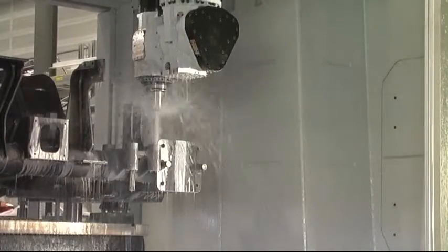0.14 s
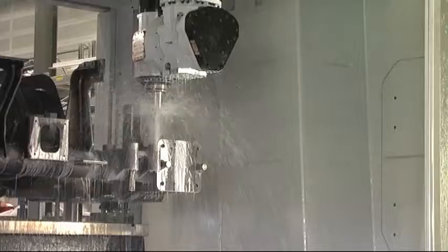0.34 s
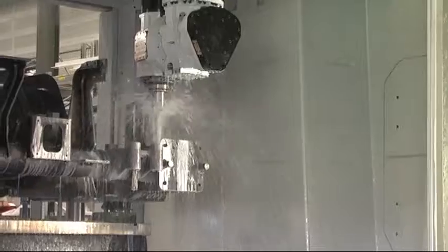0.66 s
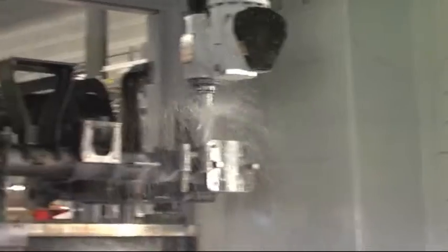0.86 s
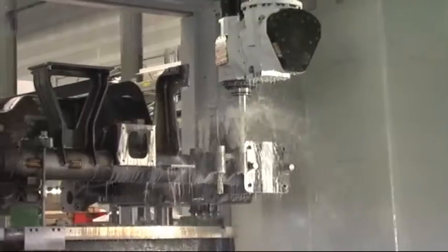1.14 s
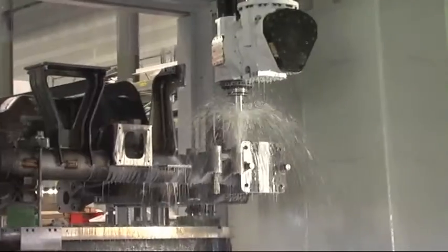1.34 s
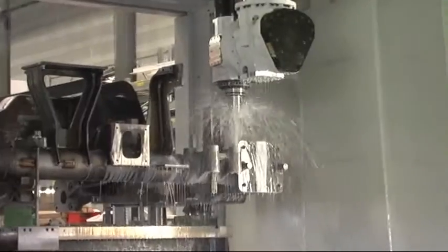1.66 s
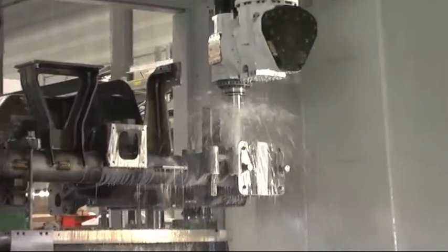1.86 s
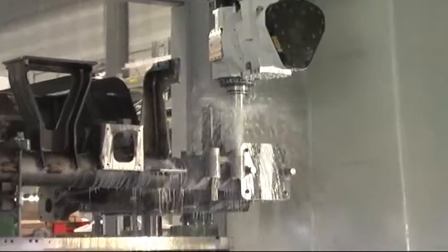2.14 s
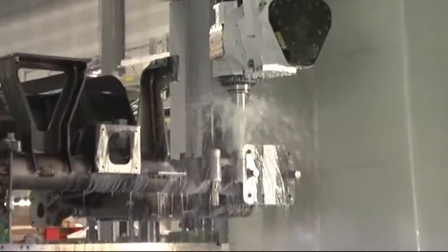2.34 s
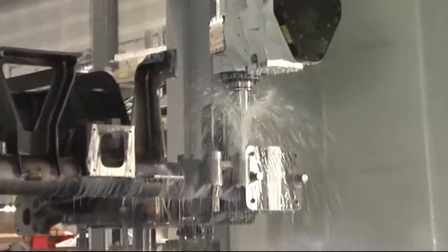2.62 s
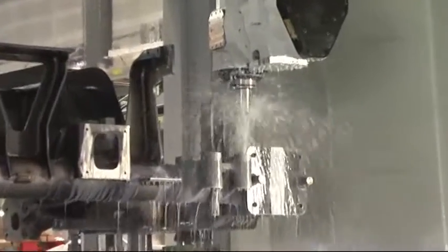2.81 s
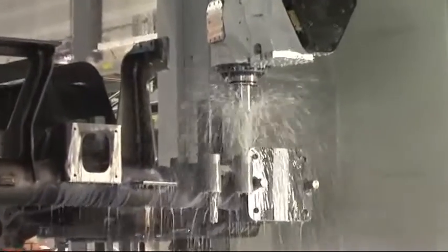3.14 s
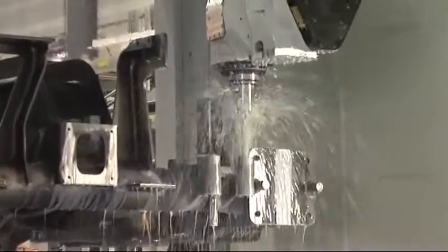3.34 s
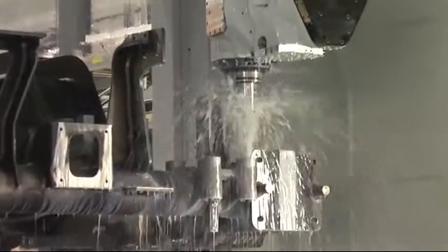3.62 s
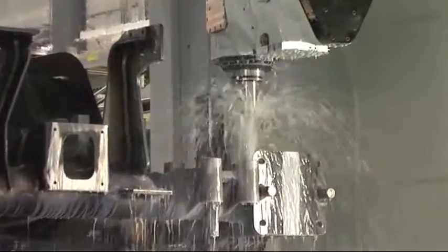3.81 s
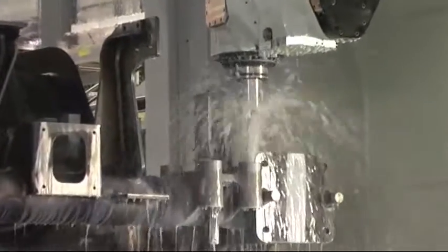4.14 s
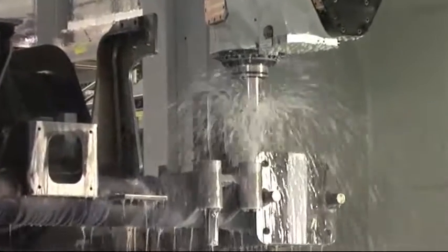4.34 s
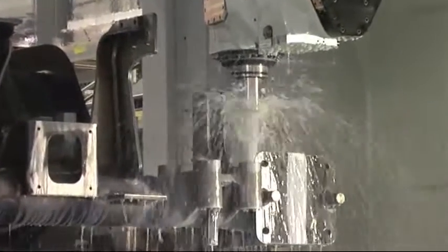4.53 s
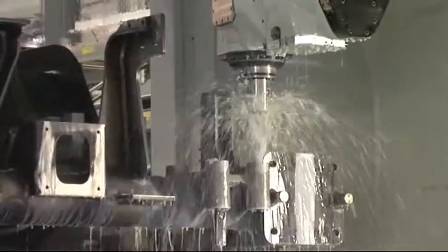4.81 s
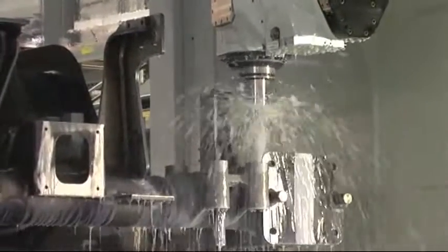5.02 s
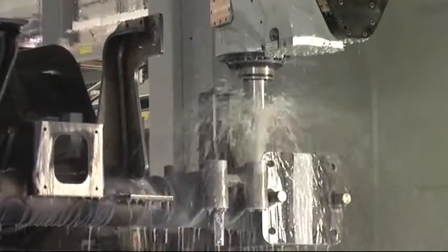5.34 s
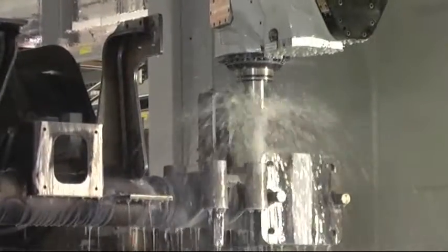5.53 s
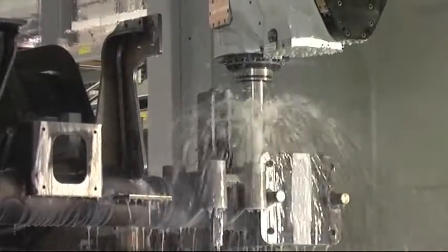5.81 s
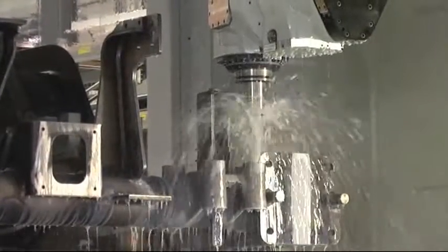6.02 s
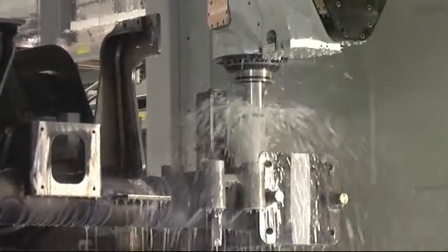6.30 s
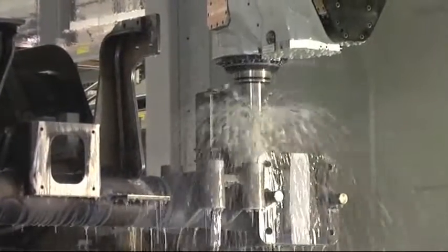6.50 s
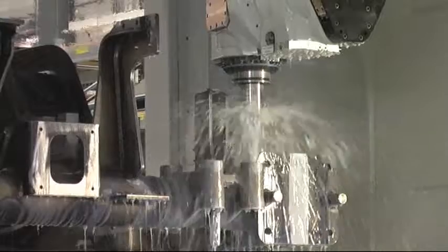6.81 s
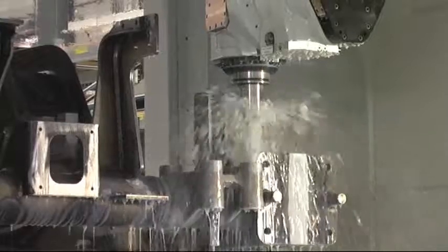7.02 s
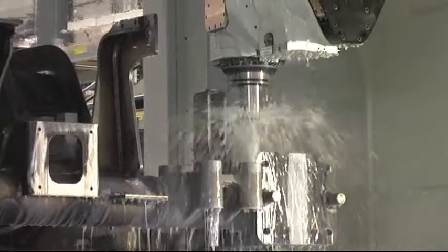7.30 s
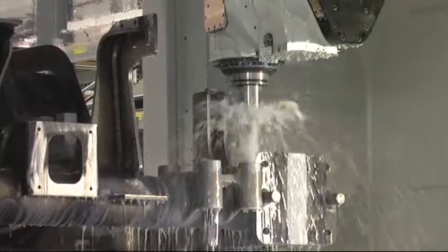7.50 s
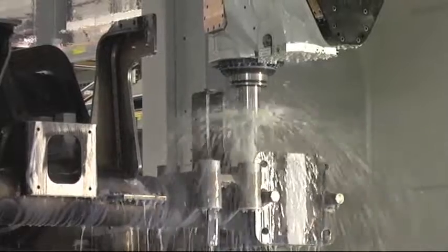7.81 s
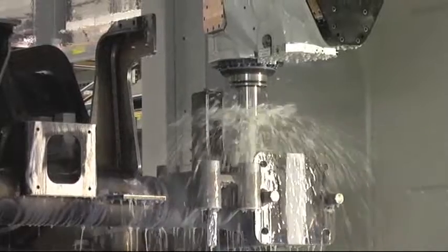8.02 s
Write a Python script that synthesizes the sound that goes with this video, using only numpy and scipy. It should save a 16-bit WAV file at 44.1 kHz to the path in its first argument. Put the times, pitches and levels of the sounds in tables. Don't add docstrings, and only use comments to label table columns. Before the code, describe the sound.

A milling cutter is already biting metal at 0 s: a loud, piercing whine near 2.5 kHz, grainy and nervous, with weaker overtones near 5 and 7.5 kHz. Until about 5 s it wavers among three very close pitches, roughly 2450 to 2525 Hz, beating, with short dips around 1, 2 and 4.5 s. Narrow fixture rings and blurred metallic resonances surround it. A dull faint knock comes near 0.1 s, a deep thump at 2.5, and tiny chip hisses at 3.2 and 3.8. At 4.96 s small snaps precede the lock on the lowest pitch, held steadier to 8 s with slight flutter; a low gear hum grows. Coolant hiss, spindle hum and hall rumble run throughout, dropping a little after the lock. Close stereo perspective, thin bass, treble ending near 11 kHz, gain pumping under the whine.

```python
import sys
import numpy as np
from scipy import signal
from scipy.io import wavfile
from scipy.ndimage import uniform_filter1d

SR = 44100
rng = np.random.default_rng(int(sys.argv[2]) if len(sys.argv) > 2 else 0)


def bounce(signal):
    frames = np.transpose(np.atleast_2d(signal))
    limited = np.clip(frames, -1, 1)
    pcm = np.round(limited * 32767).astype(np.int16)
    wavfile.write(sys.argv[1], SR, pcm)


def boost_factor(decibels):
    exponent = np.asarray(decibels, float) / 20
    return 10 ** exponent


N = 359415
TIME = np.arange(N) / SR
LOCK_S = 4.972

# (time [s], length [s], change [dB])
FALTER = [(0.14, 0.02, -2.5), (0.36, 0.27, -2.5), (0.56, 0.043, -10), (0.98, 0.03, -17), (1.1, 0.015, -8),
          (1.22, 0.055, 2), (1.4, 0.027, -6), (1.54, 0.17, -4.5), (1.58, 0.011, 6.5), (1.66, 0.038, -4),
          (1.9, 0.024, -1), (2.02, 0.05, -18), (2.24, 0.042, -9.5), (2.6, 0.075, -7), (3.16, 0.03, 0),
          (3.2, 0.098, -10.5), (3.98, 0.2, 2.5), (4.12, 0.078, -2), (4.38, 0.19, 5.5), (4.56, 0.021, -39),
          (4.66, 0.019, 6.5), (4.78, 0.56, -4.5), (5.12, 0.065, 2.5), (5.54, 0.046, -11), (6.62, 0.062, 2),
          (6.94, 0.045, -2.5), (7.0, 0.3, -5.5), (7.08, 0.048, 5.5), (7.76, 0.21, -3), (7.88, 0.05, 5)]


def chatter():
    # (time [s], lower [Hz], upper [Hz], next [Hz])
    pitch = [(0, 2453.2, 2490.6, 2524.5), (2.2, 2453.2, 2487.8, 2524), (5.2, 2453.6, 2484.6, 2522),
             (6.8, 2450.8, 2484.6, 2522), (7.3, 2452, 2484.6, 2522), (7.6, 2450.4, 2484.6, 2522),
             (8.15, 2449.7, 2484.6, 2522)]
    # (time [s], length [s], rise [dB])
    flare_lower = [(0.44, 0.081, 9.9), (0.94, 0.053, 13), (1.34, 0.076, 8), (1.72, 0.36, 6),
                   (2.02, 0.041, 15.5), (2.4, 0.075, 2), (2.72, 0.024, 0), (3.34, 0.064, 8), (3.5, 0.02, 8),
                   (3.94, 0.034, 5), (4.2, 0.078, 9.5), (4.52, 0.036, 13.5), (4.62, 0.016, 18.5),
                   (4.88, 0.04, 8)]
    # (time [s], length [s], rise [dB])
    flare_next = [(0.04, 0.19, 11.5), (0.5, 0.11, 13), (0.72, 0.12, 5.5), (1.12, 0.03, 2),
                  (1.16, 0.24, 9.5), (1.38, 0.068, 9.5), (1.66, 0.12, 6.5), (3.44, 0.014, 12),
                  (4.36, 0.013, 1.5)]
    # (time [s], length [s], change [dB])
    bite = [(0.12, 0.18, -8.5), (0.44, 0.045, -11), (0.84, 0.07, -8), (1.12, 0.053, -23),
            (1.5, 0.058, -6.4), (1.96, 0.17, -5.5), (2.16, 0.039, 5), (2.58, 0.052, 10), (2.66, 0.033, -15),
            (3.36, 0.071, -11), (3.64, 0.087, 4.5), (4.74, 0.059, 10), (4.94, 0.054, 5.5),
            (5.16, 0.039, 4.5), (5.72, 0.24, 3.7), (6.64, 0.058, -14), (7.16, 0.023, 6.8), (7.3, 0.1, -7),
            (7.5, 0.057, 7.5), (7.64, 0.17, -10)]
    # (time [s], level [dB])
    depth = [(0, -0.4), (1.2, 0), (2.2, -0.5), (2.9, -1), (3.6, -1), (4.2, 0.1), (4.9, -1), (5.7, -0.5),
             (6.5, 0.6), (7.2, 0), (8.15, -1.1)]

    lower_hz, upper_hz, next_hz = curves(pitch)
    lower_hz = lower_hz + 1.9 * wander(8.44).real
    upper_hz = upper_hz + 1.76 * wander(8.5).real
    lock = locked()
    gone_db = -21 * lock
    unborn_db = -21 * (1 - lock)
    chips = 0.19 * wander(27) + 0.07 * wander(165, count=2)

    free_db = -22.5 + swells(flare_lower, after_lock=False)
    ruling_db = -2.5 + swells(FALTER, after_lock=True)
    lower_db = (1 - lock) * free_db + lock * ruling_db
    upper_db = -10.5 + swells(FALTER, after_lock=False) + gone_db
    next_db = -24 + swells(flare_next, after_lock=False) + 1.2 * gone_db - 4
    out = tone(lower_hz, lower_db, chips + 0.55 * (1 - lock) * wander(25))
    out += tone(upper_hz, upper_db, chips + 0.24 * wander(40.0))
    out += tone(next_hz, next_db, 1.61 * wander(16.7))

    sharp_db = -45 + 1.5 * TIME
    second_db = -29 + swells(bite, after_lock=False) + gone_db
    third_db = sharp_db + gone_db
    out += tone(2 * upper_hz, second_db, 0.75 * wander(33))
    out += tone(3 * upper_hz, third_db, 1.86 * wander(32))
    out += tone(4 * upper_hz, third_db - 12, 2.7 * wander(30))
    out += tone(lower_hz + upper_hz, second_db - 8, 0.3 * wander(10.0))

    second_db = -26.5 + swells(bite, after_lock=True) + unborn_db
    third_db = sharp_db + unborn_db
    out += tone(2 * lower_hz, second_db, 0.96 * wander(15.7))
    out += tone(3 * lower_hz, third_db, 1.0 * wander(37))
    out += tone(4 * lower_hz, third_db - 5.5, 0.64 * wander(24))
    return out * boost_factor(curves(depth)[0])


def fixture():
    # (pitch [Hz], width [Hz], level [dB])
    tool = [(2531, 100, -22), (2364, 9.7, -44), (2320, 61, -32.5), (2184, 15, -37.5), (2680, 10, -41),
            (2405, 94, -20.5), (2180, 140, -27), (2730, 77, -30.5), (3210, 150, -44), (4927, 153, -32),
            (1986, 49, -39)]
    ring_db = -23 - 1.55 * TIME
    clamping = tone(2610.8, ring_db, 0.45 * wander(24.0))
    clamping += tone(2582.5, ring_db - 8.5, 0.96 * wander(12))
    rough_db = 2.5 * np.exp(np.minimum(TIME - LOCK_S, 0) / 0.21) * (1 - locked())
    spill_db = -0.074 * (swells(FALTER, after_lock=False) + swells(FALTER, after_lock=True))
    return clamping + rings(tool) * boost_factor(-2.0 + rough_db + spill_db + 2 * locked())


def thumps_and_chips():
    # (time [s], length [s], pitch [Hz], spread [Hz], level [dB])
    bursts = [
        (.13, 0.028, 375, 14, -32.5),
        (0.576, 0.043, 159.5, 12, -45),
        (2.55, .06, 70, 19, -48),
        (3.17, .012, 10700, 200, -35),
        (3.767, .01, 10700, 250, -32),
        (4.958, 0.0055, 4750, 200, -26),
        (4.961, .006, 6600, 500, -29),
    ]
    out = 0
    for s, length, hz, spread, db in bursts:
        out = out + tone(hz, db, 0.87 * wander(spread)) * np.exp(-((TIME - s) / length) ** 2)
    return out


def machine():
    # (multiple of the rotation [count], level [dB])
    spindle = [(4, -41), (6, -51.5), (7, -48), (8, -59.5), (9, -52.5), (10, -58.5), (12, -46), (13, -44.5),
               (14, -45), (15, -48), (17, -46.5), (18, -49.5), (19, -48.5), (22, -51), (33, -58),
               (34, -38.5)]
    # (time [s], level [dB])
    mesh = [(0, -57), (5.5, -41), (6.1, -37), (6.8, -40.5), (7.3, -33), (8.15, -34.5)]
    # (pitch [Hz], level [dB])
    drives = [(1222, -51.5), (4000, -54.5), (4081, -68), (4140, -50), (4685, -56), (4721, -50),
              (4746, -43.5), (6578, -85), (7197, -47.5), (8070, -78), (8210, -61), (8549, -48), (8818, -53),
              (8936, -56), (9280, -50.5)]
    turn_hz = 41.39
    hum = sum(tone(k * turn_hz, db, 0.55 * wander(2.4)) for k, db in spindle)
    hum = hum * boost_factor(1.83 - 3 * locked() - 0.094 * TIME)
    gears = tone(16 * turn_hz, curves(mesh)[0], 0.15 * wander(5))
    return hum + gears + sum(tone(hz, db, 1.25 * wander(14.0)) for hz, db in drives)


def hall():
    # (pitch [Hz], level [dB per Hz])
    rumble = [(25, -43), (60, -34), (100, -34), (125, -3.5), (165, 6), (220, -5.5), (330, -4.5),
              (430, -3.5), (520, -1.5), (770, 0), (830, -7.5), (1150, -3.5), (1450, 1), (1600, -12.5)]
    # (pitch [Hz], width [Hz], level
    # [dB])
    boom = [(123, 4.4, -48.5), (200.6, 6, -48), (262, 6.8, -47), (757, 4, -53.5), (903, 7.6, -49.5),
            (1413, 7.9, -45), (1478, 28, -44.5), (1797, 6.8, -43), (1822, 3.2, -46)]
    out = wash(rumble, -27, patchy_db=1.2, flicker_db=0.4) + ports(rings(boom), 0, 0.15, 20)
    return out * boost_factor(0.56 - 2.5 * locked())


def spray():
    # (pitch [Hz], level [dB per Hz])
    hiss = [(1200, -9), (1900, -0.5), (3000, 3.5), (3700, -3), (4300, -1), (5500, 0), (5900, -7),
            (6800, -4.5), (7400, -1), (9300, -2), (10200, -8.5), (10900, -13.5), (11050, -55), (11250, -41)]
    return wash(hiss, -24, patchy_db=1.4, flicker_db=1.0)


def gush():
    # (time [s], length [s], change [dB])
    surges = [(.12, 0.07, -1), (.32, .05, 2), (.75, .12, -1), (1.15, .1, -2.5), (1.36, 0.07, -1.5),
              (1.51, 0.038, 2), (2.05, 0.071, -2), (2.3, .08, 2.5), (3.2, 0.14, 1.5), (3.6, 0.14, 1),
              (4.12, .05, 1), (4.52, 0.022, -1.5), (4.72, .09, 2.5), (5.65, .07, 3), (5.95, 0.07, 1),
              (6.8, 0.056, 0.5), (7.05, 0.047, 0.5)]
    return boost_factor(swells(surges, after_lock=False) + swells(surges, after_lock=True))


def locked():
    return np.clip((TIME - LOCK_S) / 0.012, 0, 1)


def swells(rows, after_lock):
    t = np.arange(0, N + 64, 64) / SR
    db = sum(change * np.exp(-((t - s) / length) ** 2)
             for s, length, change in rows if (s > LOCK_S) == after_lock)
    return np.interp(TIME, t, db)


def tone(hz, db, rough):
    turn = np.exp(2j * np.pi * (np.cumsum(hz * np.ones(N)) / SR + rng.random()))
    return np.sqrt(2) * boost_factor(db) * turn * (1 + rough)


def rings(modes):
    return sum(tone(hz, db, wander(1.51 * width, count=2) - 1) for hz, width, db in modes)


def wander(hz, count=1):
    r = np.exp(-2 * np.pi * hz / SR)
    z = rng.standard_normal(N + SR) + 1j * rng.standard_normal(N + SR)
    smooth = signal.sosfilt([[1, 0.0055, 0, 1, -2 * r, r * r]] * count, z)
    return evened(smooth[SR:])


def wash(colour, db, patchy_db, flicker_db):
    # (pitch [Hz], likeness [0 to 1])
    likeness = [(60, 0.86), (130, 1), (260, 1), (550, 0.96), (1150, 0.95), (2420, 0.88), (5060, 0.87),
                (10600, 0.7)]
    frames, hz = N // 256 + 5, np.fft.rfftfreq(1024, 1 / SR)
    a, b, c, d, patches = rng.standard_normal((frames, 513, 5)).T
    patches = uniform_filter1d(patches, size=14, axis=0)
    patches = evened(uniform_filter1d(patches, size=8, axis=1))
    flicker = evened(uniform_filter1d(rng.standard_normal(frames), size=2))
    same = np.clip(read(likeness, hz), -1, 1)[:, None]
    middle = a + 1j * b
    apart = np.sqrt((1 - same) / (1 + same)) * (c + 1j * d)
    z = np.array([middle + apart, middle - apart])
    z *= boost_factor(read(colour, hz)[:, None] + patchy_db * patches + flicker_db * flicker)
    sound = signal.istft(z, nperseg=1024, noverlap=768)[1][:, :N]
    return boost_factor(db) * evened(sound)


def ports(x, balance_db, spread, spread_hz):
    side = spread * wander(spread_hz)
    left = (x * (1 + side)).real * boost_factor(balance_db / 2)
    right = (x * (1 - side)).real * boost_factor(-balance_db / 2)
    return np.array([left, right])


def evened(x):
    return x / np.sqrt(np.mean(np.abs(x) ** 2) + 1e-20)


def curves(rows):
    s, *columns = np.transpose(rows)
    return [np.interp(TIME, s, c) for c in columns]


def read(points, hz):
    f, value = np.transpose(points)
    return np.interp(np.log(hz + 1), np.log(f + 1), value)


def excess_db(x, window_s, from_db, recover_db_per_s):
    size = int(window_s * SR)
    power = uniform_filter1d((x ** 2).max(0), size=size, origin=(size - 1) // 2)
    power_db = 10 * np.log10(abs(power) + 1e-12)
    fall = TIME * recover_db_per_s
    held_db = np.maximum.accumulate(power_db + fall) - fall
    return np.maximum(held_db - from_db, 0)


def scene():
    # (time [s], balance [dB])
    balance = [(0.0, 5), (0.32, -5.5), (0.41, 0.0), (2.04, 1.5), (3.54, -4), (3.65, -3.0), (4.47, 1.5),
               (6.76, -1.5), (8.15, -2)]
    cut = ports(chatter(), curves(balance)[0], 0.16, 4.2)
    cut += ports(fixture() + thumps_and_chips(), 0, 0.52, 53)
    return cut + ports(machine(), 0, 0.094, 3.3) + (hall() + spray()) * gush()


def low_pass(x):
    return signal.sosfilt(signal.butter(12, 11200, fs=SR, output="sos"), x)


def record(dry):
    x = signal.sosfilt(signal.butter(2, 70, "high", fs=SR, output="sos"), dry)
    slow_db = excess_db(x, window_s=0.042, from_db=-15.5, recover_db_per_s=45.5)
    x = x / boost_factor(0.47 * slow_db)
    fast_db = excess_db(x, window_s=0.0024, from_db=-10.0, recover_db_per_s=83.0)
    x = x / boost_factor(0.7 * signal.lfilter([0.014], [1, -0.986], fast_db))
    band_edge = signal.firwin(701, 11110, window=("kaiser", 9), fs=SR)
    x = signal.oaconvolve(x, band_edge[None], "same")
    return low_pass(x)


dry = scene()
out = record(dry)
bounce(out)
```